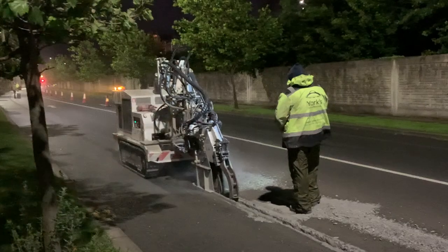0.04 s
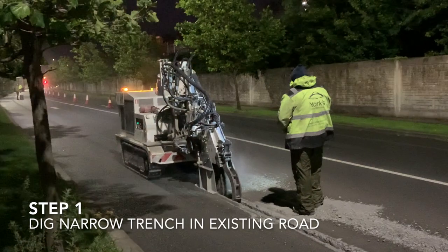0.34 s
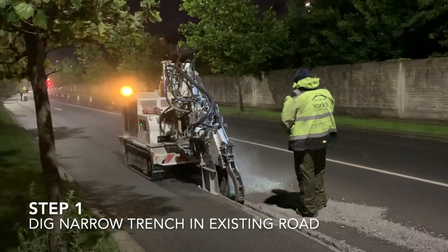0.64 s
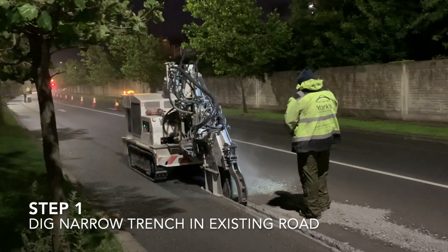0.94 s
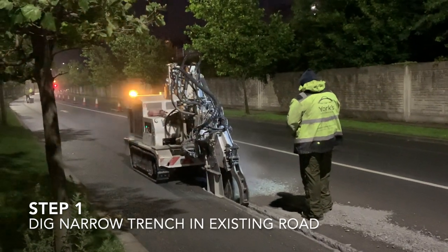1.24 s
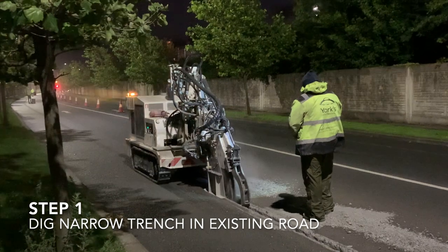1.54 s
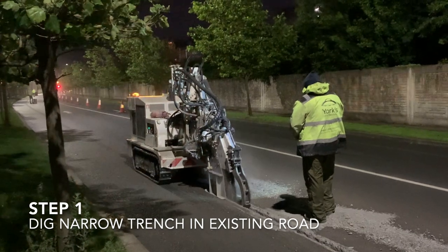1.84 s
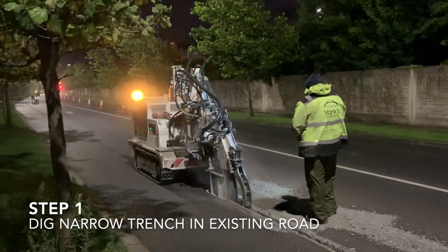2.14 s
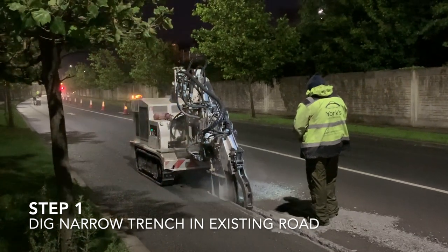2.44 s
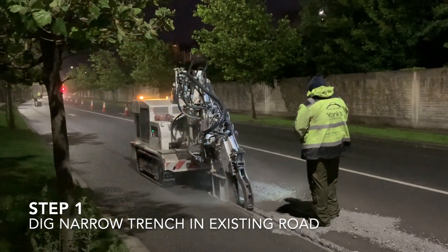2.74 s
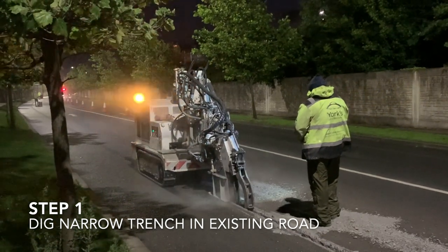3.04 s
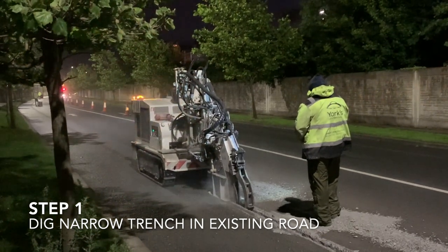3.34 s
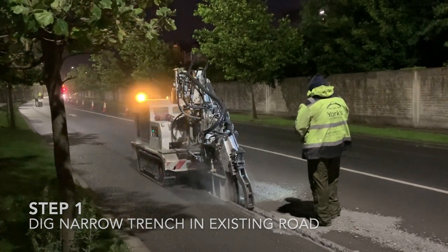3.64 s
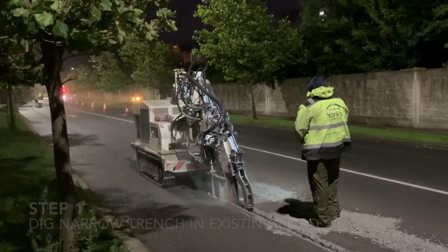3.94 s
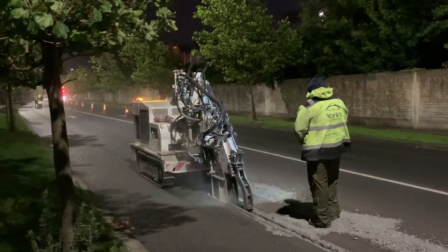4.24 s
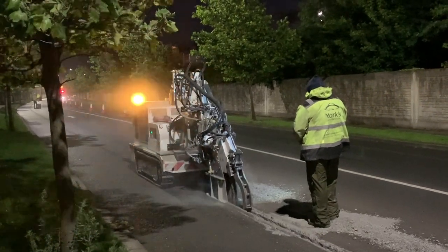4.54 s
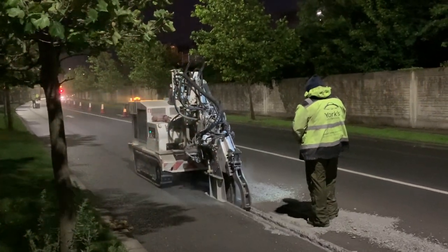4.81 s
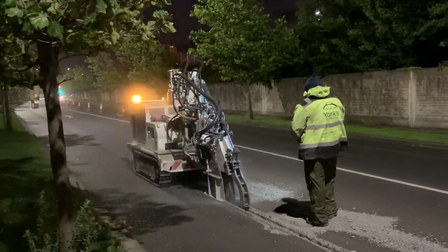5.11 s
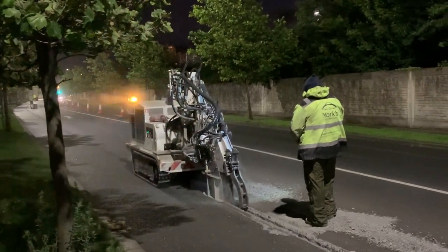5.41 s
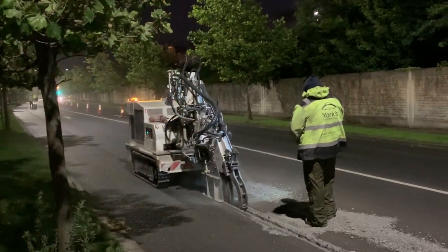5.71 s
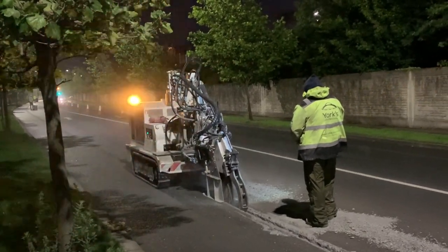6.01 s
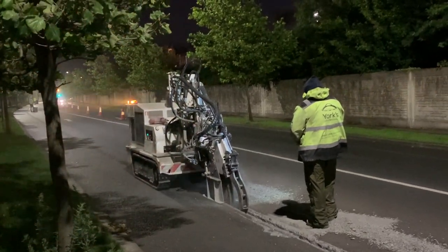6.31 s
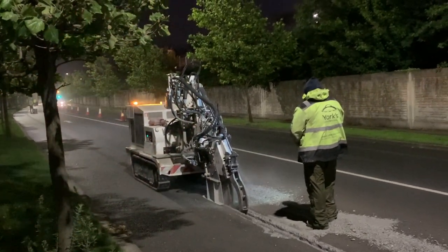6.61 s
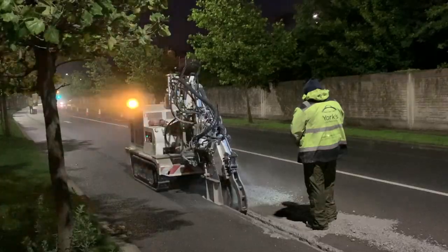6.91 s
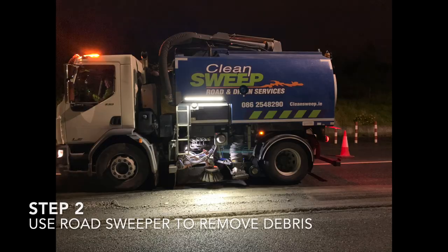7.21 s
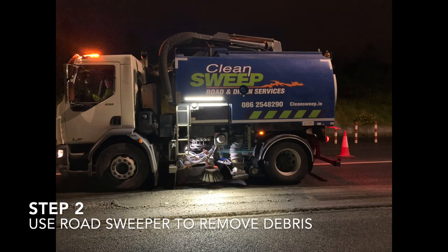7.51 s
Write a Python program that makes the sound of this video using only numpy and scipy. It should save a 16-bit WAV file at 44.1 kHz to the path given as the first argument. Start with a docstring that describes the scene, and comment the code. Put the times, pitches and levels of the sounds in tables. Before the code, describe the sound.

A tracked trencher saws into asphalt with a harsh, thumping grind, hissing grit and knocking stones over a steady diesel drone.

```python
"""A harsh, thumping grind: a tracked trencher saws an asphalt street, a few metres from a stereo mic.
The picks of its wheel thump the boom, ring the wheel and its guard, and crush stone into hissing grit.
Hard stones knock, chips snap off, the wheel groans against the slot and the boom growls under load.
Behind it a diesel drones at constant speed and the hydraulics whistle thinly.
Road, machine and a roadside wall scatter a short, diffuse trail towards the microphone."""
import sys
import numpy as np
from scipy import signal
from scipy.fft import rfft, irfft
from scipy.io import wavfile
from scipy.ndimage import uniform_filter1d

SR = 44100
rng = np.random.default_rng(int(sys.argv[2]) if len(sys.argv) > 2 else 0)


def master_out(mix):
    """Clip the mix to full scale and print it as 16-bit PCM to the path in sys.argv[1]."""
    frames = np.transpose(np.atleast_2d(mix))
    ceiling = np.clip(frames, -1, 1)
    pcm = np.round(ceiling * 32767).astype(np.int16)
    wavfile.write(sys.argv[1], SR, pcm)


N = 342216
TIME = np.arange(N) / SR
FREQ = np.maximum(np.arange(N // 2 + 1) * SR / N, 1e-3)
START_S, STOP_S = 0.09, 7.056

# diesel exhaust: multiple of the firing rate, level/dB
EXHAUST_HARMONICS = [(1, -55), (2, -60), (3, -56.5), (5, -57.5)]
# rumble of engine block and tracks: f/Hz, level/dB
RUMBLE_SPECTRUM = [(20, -43), (30, -21.5), (42, -3), (52, 0), (68, -3), (88, 3.5), (115, -3), (170, -4.5),
                   (400, -2.5), (1000, -0.5), (4000, -54.5)]
# thin whistles of the hydraulics: f/Hz, width/Hz, level/dB
HYDRAULIC_MODES = [(6620, 45, -7), (7260, 45, -4), (8060, 90, 6), (14140, 120, -2)]
# hiss of crushed stone: f/Hz, level/dB
GRIT_SPECTRUM = [(1500, -14), (2600, 0), (3200, 2), (4200, 1), (5000, -1), (5800, -4), (6600, 0), (7100, 1),
                 (8000, -1.2), (9700, -1.7), (11000, -7.5), (12000, -13), (13200, -8), (14200, -7.8),
                 (15500, -9.5)]
# flying shards ping the guard: t/s, level/dB, f/Hz
SHARD_PINGS = [(.169, -41, 9150), (.869, -39.5, 8750), (1.035, -40, 9140), (1.762, -42, 9060),
               (1.853, -39, 8800), (1.945, -39.5, 9610), (3.543, -51, 9100), (6.060, -54, 8060),
               (6.282, -39, 8900), (6.598, -40, 9980)]
# chips snap off and strike a pick: t/s, crack level/dB, ring level/dB, ring f/Hz
CHIP_SNAPS = [(0.096, -47, -37.5, 4155), (0.169, -40, -46, 4130), (0.836, -45, -36, 4140),
              (0.917, -50, -35.5, 4240), (1.0296, -42, -60, 4960), (1.2114, -41.5, -55, 3850),
              (1.851, -41, -61, 4400), (2.118, -41.5, -58.5, 3970), (3.1652, -43.5, -46, 4800),
              (3.396, -39, -38, 4300), (3.444, -40, -43, 4170), (3.731, -43, -61, 4090),
              (4.447, -52.5, -36, 4240), (4.94, -45.5, -38.5, 4260), (5.037, -52, -37, 4310),
              (5.139, -58, -39, 4530), (5.446, -60, -34.5, 4130), (5.754, -59, -36.5, 4260),
              (5.885, -46, -45, 4260), (5.992, -55, -41, 4240), (6.4056, -40, -54, 4220),
              (6.765, -57.5, -35, 4290)]
# clink of a struck pick: ratio to its main note, level/dB
CLINK_PARTIALS = [(.9, -8), (1, 0), (1.085, -6)]
# resonances of the picks: f/Hz, width/Hz, level/dB
PICK_RESONANCES = [(3313, 650, 3.5), (4090, 180, 4), (4070, 460, 7), (4440, 250, -12), (4640, 140, -6.5),
                   (4900, 50, 4.5), (5060, 530, -14.5)]
# the flank of the wheel catches the wall of the slot: t/s, length/s, level/dB, f/Hz
FLANK_RUBS = [(0.16, 0.099, -43, 700), (0.748, 0.06, -40, 720), (0.867, 0.074, -42, 790),
              (1.169, 0.051, -39.5, 725), (1.31, 0.21, -44, 740), (1.603, 0.048, -39.5, 740),
              (1.823, 0.061, -41, 770), (1.99, 0.085, -39, 735), (2.085, 0.14, -44.5, 743),
              (2.232, 0.1, -48, 766), (2.79, 0.04, -40.5, 730), (5.175, 0.11, -45.5, 730),
              (5.57, 0.48, -47, 720), (6.157, 0.063, -38, 1404), (6.878, 0.046, -38.5, 735)]
# the wheel chatters and the boom growls: t/s, length/s, level/dB, f/Hz
BOOM_GROWLS = [(0.124, 0.22, -44.5, 335), (0.197, 0.028, -29, 337.6), (0.644, 0.15, -39.5, 344.5),
               (0.7, 0.019, -35, 343), (1.212, .04, -33, 346), (1.256, 0.16, -39, 347.4),
               (1.419, 0.056, -33, 200.5), (1.617, 0.091, -47, 345), (1.97, .04, -37, 349),
               (2.3, 0.09, -56, 348), (2.67, 0.29, -50, 340), (3.095, 0.022, -36.5, 343),
               (3.277, 0.05, -36.5, 352), (4.534, 0.034, -37, 350.5), (4.724, 0.085, -43.5, 203),
               (5.167, 0.042, -41, 345), (5.27, .14, -41, 176), (5.533, 0.086, -47, 162),
               (5.73, 0.05, -41.5, 200)]
# hard stones under the wheel: t/s, knock level/dB, knock f/Hz, crunch level/dB, thump level/dB
HARD_STONES = [(0.214, -38, 690, -42, -50), (0.783, -30.5, 2040, -30, -42), (0.995, -31.5, 1330, -42, -60),
               (1.254, -35, 1620, -40.5, -44), (1.346, -36.5, 723, -36, -50), (1.393, -43, 1400, -39, -29),
               (1.439, -46, 1174, -47, -43), (1.638, -43.5, 721, -36, -54), (1.852, -37, 753, -41, -47),
               (2.116, -46, 2430, -41, -49), (2.341, -32, 764, -31.5, -56), (2.362, -34.5, 1960, -44, -60),
               (2.705, -36, 1244, -48, -46), (3.066, -34.5, 1250, -38, -55), (3.109, -40, 1020, -30, -51),
               (3.163, -38, 1940, -36, -56), (3.196, -35.5, 1983, -35, -54), (3.284, -49, 1360, -34, -48),
               (3.403, -41, 2034, -39, -55.5), (3.444, -35.5, 1330, -35, -47), (3.535, -35, 1184, -46, -54),
               (3.585, -35, 1244, -35, -50.5), (3.934, -33.5, 1327, -36, -47),
               (4.204, -35.5, 1334, -46, -59), (4.232, -35, 1257, -33, -40), (4.569, -35, 1390, -35, -60),
               (4.942, -30.5, 1313, -38.5, -59), (5.163, -36, 1940, -43, -50),
               (5.323, -32.5, 1400, -32.5, -44), (5.423, -36.5, 1430, -29.5, -50.5),
               (5.479, -35, 1230, -52, -38), (5.598, -37, 1030, -32, -37), (5.682, -37, 1647, -42.5, -60),
               (5.891, -41.5, 1370, -29.5, -52), (6.064, -39, 1006, -31, -32.5),
               (6.372, -34, 2030, -45, -49), (6.642, -37, 793, -30, -48), (6.788, -35.5, 1270, -46, -58.5),
               (6.882, -36, 1614, -33, -47.5)]
# resonances of wheel and guard: f/Hz, width/Hz, level/dB
WHEEL_MODES = [(642, 96, 0), (735, 180, -4.5), (849, 140, -4.5), (1015, 140, -8.5), (1191, 110, 1.5),
               (1299, 51, -4.5), (1414, 66, 1.5), (1634, 40, -2), (1870, 580, -5.5), (1978, 260, -4.5),
               (2263, 52, -22), (2412, 59, -8)]
# resonances of boom and chassis: f/Hz, width/Hz, level/dB
BOOM_MODES = [(151.6, 47, -3), (180.4, 30, -4.5), (204.4, 50, -1.5), (235, 23, -5.5), (313, 23, -0.5),
              (352.8, 28, 0.5), (483.2, 24, -1)]
# the boom's upper resonances against its lower ones: t/s, level/dB
BOOM_UPPER_RING = [(0.1, -1), (0.5, 1.5), (0.75, 4.5), (0.95, -1), (1.25, 0), (2.0, 2.5), (2.6, -2.5),
                   (3.3, 0.5), (3.6, 0), (4.9, -2.5), (6.3, 1.5), (7.04, -0.5)]
# how hard the wheel is fed into the road between bites: t/s, thrust/dB, grinding/dB, grit/dB
WHEEL_FEED = [(0.1, -38.5, -38.5, -47), (0.37, -41.5, -38.5, -45), (0.48, -46, -41.5, -49),
              (0.62, -42, -41.5, -49.5), (0.74, -44.5, -40, -46), (1.15, -39.5, -40, -48.5),
              (1.45, -41, -39.5, -47.5), (1.7, -43, -40.5, -48), (2.3, -40.5, -38, -45.5),
              (2.5, -40.5, -41.5, -48), (3.0, -44, -41.5, -47.5), (3.4, -41, -43, -49.5),
              (3.68, -43.5, -42.5, -47.5), (4.1, -39, -38, -46), (4.36, -43.5, -41, -49),
              (4.85, -43, -43, -50.5), (5.7, -42.5, -39, -45.5), (6.8, -41.5, -40.5, -47.5),
              (7.04, -41.5, -42.5, -48.5)]
# the wheel bites a harder lump: t/s, length/s, extra thrust/dB, extra grinding/dB, extra grit/dB
LUMP_BITES = [(0.138, 0.051, 4.5, 2.5, 1.5), (0.692, 0.021, 15, 3.5, 5.5), (0.762, 0.043, 8, 2, 0.5),
              (0.852, 0.077, 3.5, 2.5, 1), (1.217, 0.08, 2, 0.5, 0), (1.302, 0.12, -2.5, 4, 2),
              (1.804, 0.093, 3, 2, 0), (2.097, 0.022, 9, 3, 6), (2.262, 0.1, 2.5, 1, 1.5),
              (2.65, 0.25, 3.5, 2, 2), (3.062, 0.066, 6.5, 2, 4), (3.143, 0.063, 5.5, 3, 5.5),
              (3.253, 0.05, 4.5, 5, 6), (3.382, 0.067, 2.5, 4.5, 3.5), (3.47, 0.17, -0.5, 1.5, 3.5),
              (3.707, 0.16, 0.5, 1.5, 1.5), (4.085, 0.02, -2, 2, 6), (4.213, 0.043, 0.5, -2.5, 5.5),
              (4.416, 0.039, 7, 3, 4), (4.518, 0.084, 7.5, 3.5, 4), (4.634, 0.11, 2.5, 3.5, 3),
              (4.905, 0.06, 4, 2, 2), (5.137, 0.055, 6, 3.5, 4), (5.318, 0.024, 8, 3, 3.5),
              (5.398, 0.08, 2, 1, 1.5), (5.563, 0.17, 2, -0.5, 0), (5.865, 0.033, -5, 1.5, 3),
              (6.04, 0.027, 4, 1.5, 3), (6.166, 0.023, 7, 2.5, 3.5), (6.315, 0.065, 0.5, 3.5, 1),
              (6.587, 0.065, 3.5, 1.5, 0.0), (6.734, 0.082, 4, 1, 1), (6.839, 0.13, 1.5, 2.5, 2)]


def undb(db):
    """Decibels to gain."""
    return 10 ** (np.asarray(db) / 20)


def unit(x):
    """Scale to rms 1."""
    return x / np.sqrt(np.mean(x ** 2))


def noise():
    """White noise."""
    return rng.standard_normal(N)


def walk(rate_hz):
    """Random levels, each held 1 / rate_hz s, smoothed twice; rms 1."""
    hold = int(SR / rate_hz)
    steps = noise()[np.arange(N) // hold]
    return unit(uniform_filter1d(uniform_filter1d(steps, hold), hold))


def shaped(x, gain):
    """Causal filter with this magnitude response, scaled to keep the power of white noise."""
    cepstrum = irfft(np.log(unit(gain) + 1e-6), N)
    cepstrum[1:N // 2] *= 2
    cepstrum[N // 2 + 1:] = 0
    return irfft(rfft(x) * np.exp(rfft(cepstrum)), N)


def colour(points):
    """Magnitude response through points of f/Hz, level/dB."""
    hz, db = np.transpose(points)
    return undb(np.interp(np.log(FREQ), np.log(hz), db))


def body(modes, low_hz, high_hz):
    """Magnitude response of damped resonances that radiate between two edges."""
    power = sum(undb(db) ** 2 / (1 + ((FREQ ** 2 - hz ** 2) / (FREQ * width)) ** 2)
                for hz, width, db in modes)
    return np.sqrt(power / (1 + (low_hz / FREQ) ** 8) / (1 + (FREQ / high_hz) ** 12))


def held(start_s, length_s, attack_s, release_s):
    """Envelope from 0 to 1: attack, hold until the length is over, release."""
    age = TIME - start_s
    return np.clip(age / attack_s, 0, 1) * np.clip(1 - (age - length_s) / release_s, 0, 1)


def bursts(times, db, rise_s, decay_s):
    """Envelope of fractures that build up and die away."""
    out = np.zeros(N)
    age = TIME[:SR // 4]
    shape = (1 - np.exp(-age / rise_s)) * np.exp(-age / decay_s)
    for t, gain in zip(times, undb(db)):
        i = int(t * SR)
        out[i:i + len(age)] += gain * shape[:N - i] / shape.max()
    return out


def crushing(blows, decay_s, steady):
    """Envelope of stone crumbling for a moment after each blow, over a steady scraping."""
    crumble = unit(signal.lfilter([1], [1, -np.exp(-1 / (SR * decay_s))], blows))
    return unit(crumble + steady)


def clinks(times, db, pitch_hz, rise_s, decay_s, rough):
    """Each hard contact rings at its own pitch, roughened as the stone crumbles."""
    out = np.zeros(N)
    age = TIME[:SR // 8]
    shape = (1 - np.exp(-age / rise_s)) * np.exp(-age / decay_s)
    for t, gain, hz in zip(times, undb(db), pitch_hz):
        phase = 2 * np.pi * hz * age + rough * np.cumsum(rng.standard_normal(len(age)))
        i = int(t * SR)
        out[i:i + len(age)] += gain * shape / shape.max() * np.sin(phase)
    return out


def loose_stones(level_db, modes_hz, decay_s, rough, count, detune=0.02):
    """Small stones strike at random moments, each sounding close to one of the modes."""
    moment, softness, choice, offset = rng.random((count, 4)).T
    times = moment * STOP_S
    db = np.interp(times, TIME, level_db) - 10 * softness
    hz = np.asarray(modes_hz)[(choice * len(modes_hz)).astype(int)] * (1 + detune * (offset - 0.5))
    return clinks(times, db, hz, decay_s / 10, decay_s, rough)


def street(x, wet_db, smear_s=0.032):
    """Scatter from road, machine and wall trails the sound and differs on each side of the mic."""
    keep = np.exp(-1 / (SR * smear_s))
    trail = np.sqrt(signal.lfilter([1 - keep], [1, -keep], x ** 2 + 1e-18))
    return (x + undb(wet_db) * trail * rng.standard_normal((2, N))) / np.hypot(1, undb(wet_db))


def mic(x, lag_ms, pan_db):
    """Stereo microphone: the right side is reached lag_ms later, the left is pan_db louder."""
    side = np.array([[1], [-1]])
    delay = np.exp(side * 1j * np.pi * FREQ * lag_ms / 1000)
    return undb(side * pan_db / 2) * irfft(rfft(x) * delay, N)


def diesel(firing_hz=66.6, waver=0.0015, throb_db=0.8):
    """In the background, a little right: firings drone, block and tracks rumble, hydraulics whistle."""
    phase = 2 * np.pi * np.cumsum(firing_hz * (1 + waver * walk(rate_hz=5))) / SR
    drone = sum(undb(db + throb_db * walk(rate_hz=13)) * np.sqrt(2) * np.sin(multiple * phase)
                for multiple, db in EXHAUST_HARMONICS)
    rumble = undb(-48) * shaped(street(noise(), wet_db=-8), colour(RUMBLE_SPECTRUM))
    whistle = undb(-60) * shaped(noise(), body(HYDRAULIC_MODES, low_hz=5450, high_hz=16000))
    return mic(drone + rumble + whistle, lag_ms=-0.45, pan_db=-1.5)


def grain_ticks(level_db, count=800, decay_s=0.0018, low_hz=5500):
    """Single grains of grit crunch on road and steel, a few harder than the rest."""
    moment, hardness = rng.random((count, 2)).T
    landings = np.bincount((moment * N).astype(int), undb(10 * hardness ** 2), N)
    snaps = unit(noise() * signal.lfilter([1], [1, -np.exp(-1 / (SR * decay_s))], landings))
    return shaped(snaps * undb(level_db), colour(GRIT_SPECTRUM) / np.hypot(1, (low_hz / FREQ) ** 2))


def pick_rings(times, db, hz, rebound_s=0.0087, rebound_db=-6.5):
    """A chip strikes a pick with a crisp clink of three close modes and rebounds once."""
    out = np.zeros(N)
    for ratio, mode_db in CLINK_PARTIALS:
        for late_s, loss_db in [(0, 0), (rebound_s, rebound_db)]:
            spot_db = rng.uniform(-1, 1, len(times))  # each chip strikes a different spot
            out += clinks(times + late_s, db + mode_db + loss_db + spot_db, hz * ratio,
                          rise_s=0.0011, decay_s=0.0075, rough=0.11)
    return out


def grit(blows, grit_db, cracks, rings):
    """Countless grains burst at the slot; shards ping the guard and the picks ring off to the right."""
    grains = noise() * undb(-1.5 * walk(rate_hz=3000))
    grains = unit(grains * crushing(blows, decay_s=0.016, steady=0.36))
    spray = grains * np.hypot(undb(grit_db + 0.97), cracks)
    # the spray reaches the microphone almost directly
    hiss = shaped(street(spray, wet_db=-8, smear_s=0.0029), colour(GRIT_SPECTRUM))
    ping_hz = np.linspace(7600, 10000, 40)
    pings = loose_stones(grit_db + 1.5, ping_hz, decay_s=0.013, rough=0.2, count=240)
    scouring = street(grains * undb(grit_db - 6), wet_db=6.5, smear_s=0.0071)
    picks = shaped(scouring, body(PICK_RESONANCES, low_hz=3200, high_hz=6900))
    pick_hz = [hz for hz, width, db in PICK_RESONANCES]
    tinkle = loose_stones(grit_db + 1.5, pick_hz, decay_s=0.017, rough=0.058, count=220)
    shards = clinks(*np.transpose(SHARD_PINGS), rise_s=0.0007, decay_s=0.006, rough=0.2)
    debris = mic(hiss + pings + shards + grain_ticks(grit_db - 8), lag_ms=-0.2175, pan_db=1)
    return debris + mic(picks + rings + tinkle, lag_ms=0.068, pan_db=-6.5)


def flank_groan(tone_db=-3, scrape_db=-3.5, brush_db=-51, waver=0.014):
    """Left of centre, the wheel's flank brushes the slot and sings unsteadily where it catches."""
    wavering_time = np.cumsum(1 + waver * walk(rate_hz=82)) / SR
    pressure, tone = np.zeros((2, N))
    for start, length, db, hz in FLANK_RUBS:
        rub = undb(db) * held(start, length, attack_s=0.014, release_s=0.015)
        pressure += rub
        tone += rub * np.sin(2 * np.pi * hz * wavering_time)
    friction = noise() * np.hypot(undb(brush_db), undb(scrape_db) * pressure)
    scrape = shaped(street(friction, wet_db=-1), body([(731, 91, 0)], low_hz=640, high_hz=876))
    return mic(scrape + undb(tone_db) * tone, lag_ms=0.14, pan_db=4.5)


def boom_growl(waver=0.025):
    """In spells of heavy load the wheel chatters and keeps one resonance of the boom ringing."""
    wavering_time = np.cumsum(1 + waver * walk(rate_hz=110)) / SR
    tone = np.zeros(N)
    for start, length, db, hz in BOOM_GROWLS:
        chatter = undb(db) * held(start, length, attack_s=0.02, release_s=0.02)
        tone += chatter * np.sin(2 * np.pi * hz * wavering_time + rng.uniform(0, 2 * np.pi))
    return mic(tone, lag_ms=0.4, pan_db=0)


def stone_knocks(times, db, hz, guard_hz=1421):
    """A hard stone rings one mode of the wheel and, more softly, the guard's own note."""
    knock = clinks(times, db, hz, rise_s=0.0025, decay_s=0.0091, rough=0.069)
    guard = clinks(times, db - 13.5, [guard_hz] * len(times), rise_s=0.003, decay_s=0.0085, rough=0.054)
    return knock + guard


def stone_crunches(times, db, count=5, gap_s=0.0065, fade_db=-0.7):
    """Envelope of stones breaking, each in a quick uneven run of weakening snaps."""
    snap = np.arange(count)
    snap_times = times[:, None] + gap_s * (snap + rng.uniform(-0.3, 0.3, (len(times), count)))
    snap_db = db[:, None] - 3 + fade_db * snap
    return bursts(snap_times.ravel(), snap_db.ravel(), rise_s=0.0005, decay_s=0.003)


def wheel_load():
    """Thrust, grinding and grit in dB: the slow feed, shifted for as long as each bite lasts."""
    times, *columns = np.transpose(WHEEL_FEED)
    feed_db = np.array([np.interp(TIME, times, column) for column in columns])
    return feed_db + sum(np.outer(extra_db, held(start, length, attack_s=0.026, release_s=0.013))
                         for start, length, *extra_db in LUMP_BITES)


def pick_blows(turn_hz=5.3, picks=32, wear_db=1.5, stone_db=0.5, drift_s=0.003):
    """One blow per pick; uneven wear and spacing repeat every turn, the stone differs every time."""
    blow = np.arange(int(N / SR * turn_hz * picks))
    spacing, wear = rng.standard_normal((picks, 2))[blow % picks].T
    slip, stone = rng.standard_normal((len(blow), 2)).T
    times = (blow + 0.303 * spacing + 0.2274 * slip) / (turn_hz * picks)
    times += drift_s * np.interp(times, TIME, walk(rate_hz=3))  # the loaded wheel turns unevenly
    size = undb(wear_db * np.tanh(wear) + stone_db * np.tanh(stone))
    return np.bincount((times * SR).astype(int) % N, size, N)


def moving_contact(x, depth_db, rate_hz, count=9, lowest_hz=250):
    """The contact point keeps moving, so every half octave of the steel swells and fades by itself."""
    place = np.clip(2 * np.log2(FREQ / lowest_hz), 0, count - 1)
    spectrum = rfft(x)
    bands = (irfft(spectrum * np.maximum(1 - abs(place - k), 0), N) for k in range(count))
    return sum(band * undb(depth_db * np.tanh(walk(rate_hz))) for band in bands)


def wheel(blows, grind_db, knocks, crunches, split_hz=1500):
    """Dead ahead, crushed stone rings the steel wheel and guard; loose stones rattle on single modes."""
    grinding = crushing(blows, decay_s=0.008, steady=0.51) * undb(grind_db)
    drive = street(noise() * np.hypot(grinding, crunches), wet_db=0, smear_s=0.002)
    steel = shaped(drive, body(WHEEL_MODES, low_hz=533, high_hz=3200))
    modes_hz = np.array(WHEEL_MODES)[:, 0]
    wheel_hz, guard_hz = modes_hz[modes_hz < split_hz], modes_hz[modes_hz >= split_hz]
    rattle = loose_stones(grind_db + 1.5, wheel_hz, decay_s=0.014, rough=0.04, count=280)
    rattle += loose_stones(grind_db - 2.5, guard_hz, decay_s=0.014, rough=0.06, count=260)
    steel = moving_contact(steel, depth_db=1.05, rate_hz=26)
    return mic(steel + knocks + rattle, lag_ms=0.054, pan_db=-0.45)


def boom(blows, thrust_db, thumps, sway_db=1.7, split_hz=280):
    """The blows and drag of the wheel shake the heavy frame; its upper resonances swell and fade."""
    drag = 0.64 * noise() * crushing(blows, decay_s=0.0096, steady=0.27)
    drive = unit(unit(blows) + drag) * undb(thrust_db) + thumps * noise()
    frame = shaped(street(drive, wet_db=-10.5), body(BOOM_MODES, low_hz=121, high_hz=596))
    upper = irfft(rfft(frame) / (1 + (split_hz / FREQ) ** 12), N)
    ring_db = np.interp(TIME, *np.transpose(BOOM_UPPER_RING)) + sway_db * np.tanh(walk(rate_hz=16))
    lower = mic(frame - upper, lag_ms=0.22, pan_db=-2.5)
    return lower + mic(upper * undb(ring_db), lag_ms=0.42, pan_db=0)


def scene():
    """The trencher from a few metres: the crumbling road makes its noise flutter and the boom lurch."""
    thrust_db, grind_db, grit_db = wheel_load()
    blows, flutter, lurch = pick_blows(), walk(rate_hz=52), walk(rate_hz=20)
    puff_db = np.sin(2 * np.pi * 21.8 * TIME + walk(rate_hz=3.5))  # grit leaves the guard in quick puffs
    stone_times, knock_db, knock_hz, crunch_db, thump_db = np.transpose(HARD_STONES)
    thumps = bursts(stone_times, thump_db, rise_s=0.0082, decay_s=0.0087)
    knocks = stone_knocks(stone_times, knock_db, knock_hz)
    crunches = stone_crunches(stone_times, crunch_db)
    chip_times, crack_db, ring_db, ring_hz = np.transpose(CHIP_SNAPS)
    cracks = bursts(chip_times, crack_db, rise_s=0.003, decay_s=0.024)
    rings = pick_rings(chip_times, ring_db, ring_hz)
    machine = boom(blows, thrust_db + 0.8 * flutter + 0.6 * np.tanh(lurch), thumps)
    machine += wheel(blows, grind_db + 0.43 * flutter, knocks, crunches)
    machine += grit(blows, grit_db + 0.7 * flutter + puff_db, cracks, rings)
    machine += flank_groan() + boom_growl() + diesel()
    fade_in = np.clip((TIME - START_S) / 0.0068 + 0.5, 0, 1)
    fade_out = np.clip((STOP_S - TIME) / 0.021 + 0.5, 0, 1)
    return machine * fade_in * fade_out


def record(dry, cutoff_hz=15250):
    """The recorder cuts the top of the treble."""
    return signal.sosfilt(signal.ellip(10, 0.2, 80, cutoff_hz, fs=SR, output="sos"), dry)


dry = scene()
out = record(dry)
master_out(out)
```